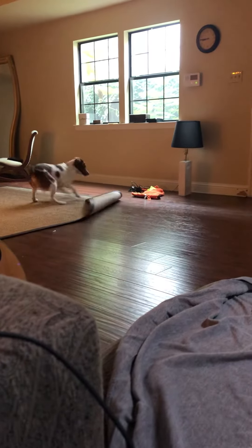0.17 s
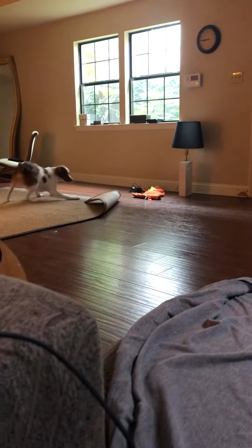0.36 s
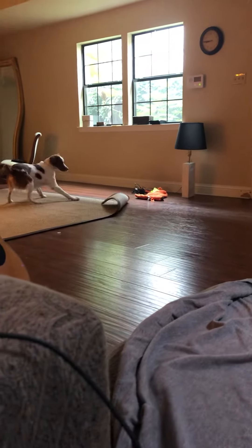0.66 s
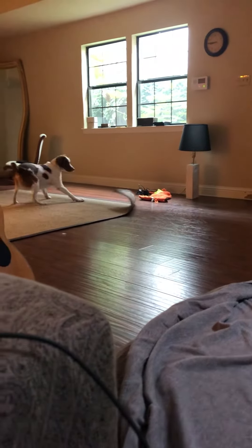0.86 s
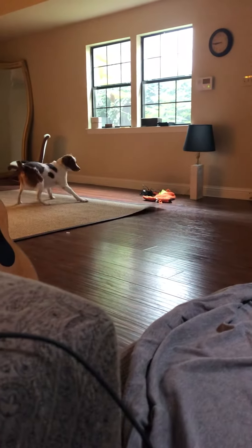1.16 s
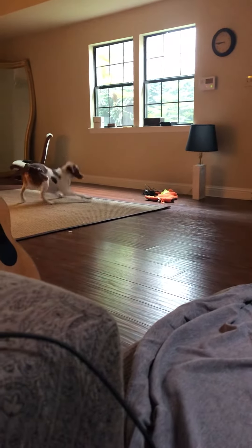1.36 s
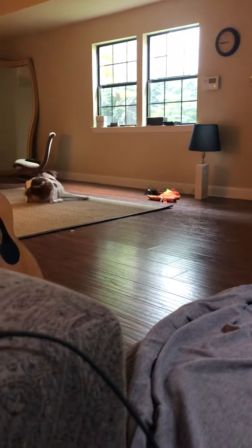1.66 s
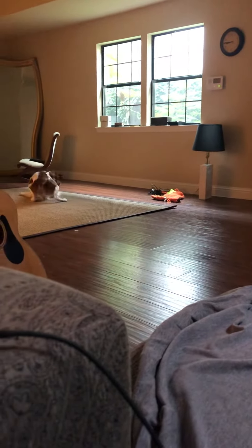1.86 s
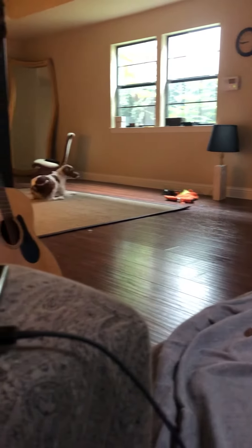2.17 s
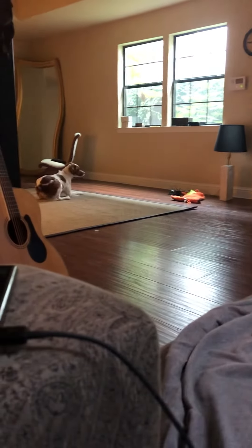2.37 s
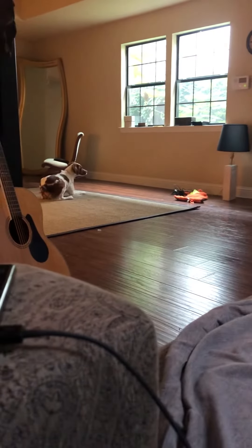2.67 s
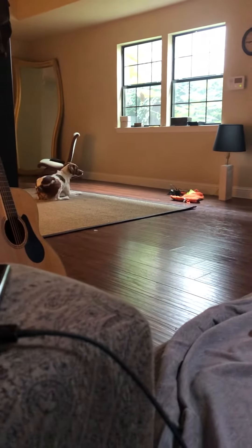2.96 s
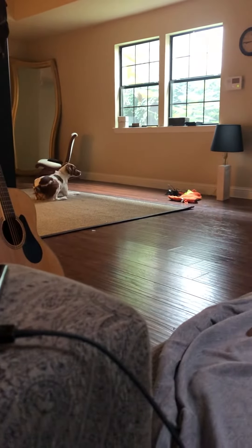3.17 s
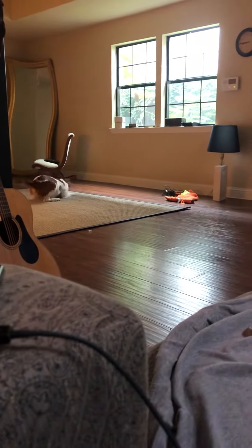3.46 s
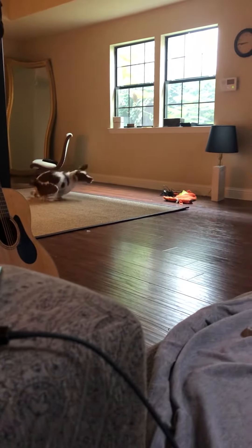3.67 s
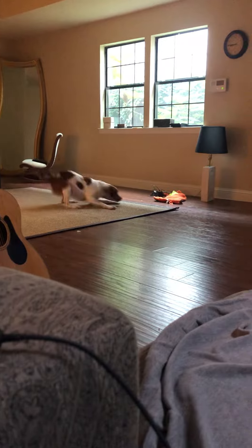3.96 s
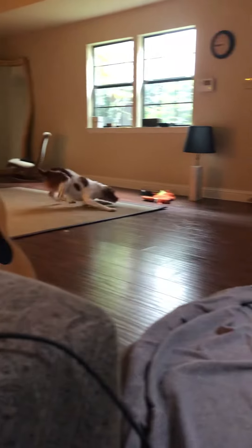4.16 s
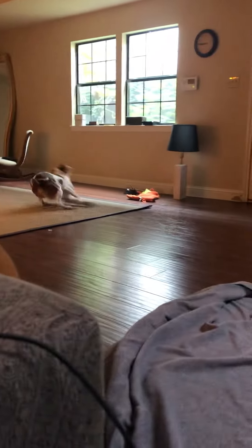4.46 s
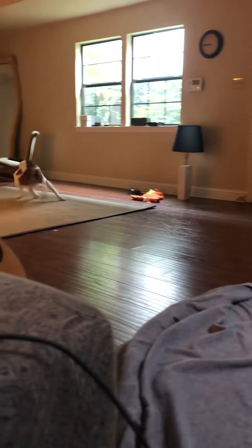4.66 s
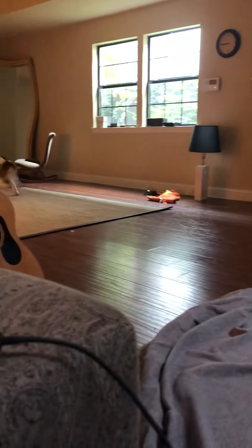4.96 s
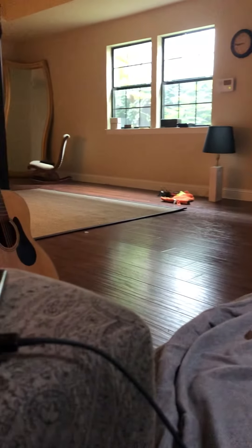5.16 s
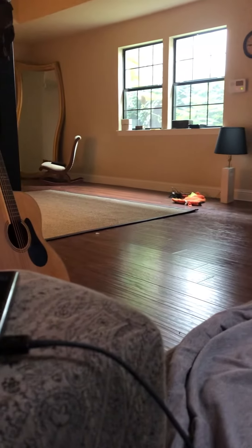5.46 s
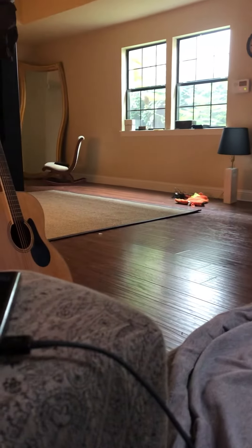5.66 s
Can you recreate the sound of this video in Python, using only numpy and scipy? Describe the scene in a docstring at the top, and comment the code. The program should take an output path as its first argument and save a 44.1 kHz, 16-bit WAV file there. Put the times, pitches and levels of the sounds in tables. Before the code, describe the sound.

A small dog scuffs and thuds on a rug, a rug corner slaps down, then claws skitter across a wooden floor.

```python
"""Paws scuff a rug and thud on the boards beneath: a small dog romps in a living room, a few metres away.
Fibres catch and let go; each landing rings the floorboard modes. A rolled-up corner of the rug uncurls
and slaps down. The dog dashes off, its claws skittering over bare wood in tiny noise bursts.
The room adds echoes and reverb. Under it all lie the house's rumble and two faint electrical whines."""
import sys
import numpy as np
from scipy import signal
from scipy.fft import rfft, irfft, next_fast_len
from scipy.io import wavfile

SR = 44100
rng = np.random.default_rng(int(sys.argv[2]) if len(sys.argv) > 2 else 0)


def master(y):
    """Save y as 16-bit WAV."""
    cut = np.clip(np.atleast_2d(y).T, -1, 1)
    pcm = np.round(cut * 32767)  # scale
    wavfile.write(sys.argv[1], SR, pcm.astype(np.int16))


N = 257103
TIME_S = np.arange(N) / SR

# Paw sweeps over the rug. Each row: start in seconds, length in seconds, relative levels in dB of
# weave rasp, pile hiss and board drumming, grip from 0 to 1.
PAW_STROKES = [(-0.02, 0.12, -51, -59.5, -49.5, 0), (0.128, 0.098, -48, -56, -46.5, .02),
               (0.197, 0.13, -51, -69, -48.5, .02), (0.356, 0.031, -49.5, -58.5, -46, 0.1),
               (0.412, 0.056, -47, -56, -49.5, 0), (0.477, .14, -56, -68, -57.5, 0.23),
               (1.384, .12, -49, -75, -53, 0), (1.506, 0.18, -44, -52.5, -39.5, 0.8),
               (1.688, 0.21, -46, -54, -46.5, 0.28), (1.876, 0.23, -54, -64, -50.5, 0.06),
               (2.094, 0.14, -53, -61.5, -64, 0), (3.276, 0.074, -58, -62.5, -56.5, 0),
               (3.341, 0.14, -50.5, -59.5, -47, 0.2), (3.44, 0.23, -43, -51.5, -38, 0.22),
               (3.637, 0.1, -42, -50.5, -37, .1), (3.758, 0.12, -46.5, -61, -42.5, 0.15),
               (3.876, 0.16, -47.5, -54.5, -39.5, 0.4), (4.038, .15, -53, -65, -49, 0.03),
               (4.228, .05, -52, -66, -46.5, .6), (4.272, 0.093, -40.5, -52, -38.5, 0.85),
               (4.358, 0.11, -35.5, -47, -35.5, 0.45), (4.496, 0.11, -42.5, -53.5, -46.5, 0.64),
               (4.648, 0.076, -35.5, -49, -41, 0.77), (4.712, .12, -41, -53, -39, 0.14),
               (4.853, 0.059, -35, -51.5, -39, 0.2), (4.915, .19, -44, -66, -43.5, 0.22),
               (5.152, .06, -39, -54, -51, .55), (5.222, 0.098, -43, -60, -41.5, .15),
               (5.352, 0.083, -55, -62, -43, .2), (5.458, 0.19, -61, -56, -48.5, 0.7),
               (5.688, 0.062, -62, -59.5, -47.5, .1), (5.778, 0.052, -66, -55, -55, 0.47)]
# Noise spectra. Each row: frequency in Hz, relative density in dB.
BRUSH_SPECTRUM = [(300, -15), (700, 0), (950, 0.5), (1400, -1.5), (1900, -1), (2450, -6), (3200, -7.5),
                  (4300, -21), (6000, -22.5), (10000, -30)]  # weave, lightly brushed
DIG_SPECTRUM = [(400, -3), (750, 1), (1300, -11.5), (1800, -6.5), (2200, 6.5), (2600, -3), (3050, -13),
                (4200, -12), (8000, -46)]  # backing, creaking under a hard dig
PILE_SPECTRUM = [(2000, -5), (3800, -3), (4700, 0.5), (5600, 1), (6700, -6.5), (10000, -10.5), (13000, -12),
                 (16000, -15)]  # pile hiss
DRUM_SPECTRUM = [(130, -69), (250, -6.5), (350, -6), (520, 0), (680, -4.5), (900, -11.5), (1500, -11.5)]  # boards under the rug
BOOM_SPECTRUM = [(35, -11), (70, -11), (120, 4), (170, 0.5), (260, 5), (400, -2), (800, -41)]  # subfloor
HOUSE_SPECTRUM = [(15, -42.5), (25, -25), (96, -3.5), (164, -7), (233, -18.5), (445, -20), (614, -19),
                  (684, -19.5), (782, -23), (895, -21.5), (1080, -26.5), (1570, -29), (6730, -38.5),
                  (7910, -38), (15500, -42)]  # background rumble and hiss
SLIP_SPECTRUM = [(200, -49), (600, 5), (950, -3), (1400, -6), (1900, -4), (2450, 1.5), (3100, -10.5),
                 (4000, -16.5), (6000, -21.5), (15000, -64)]  # paw breaking loose
CRACK_SPECTRUM = [(250, -23), (600, -10), (1100, -36), (1400, 0), (1950, -4.5), (2700, 0.5), (3800, -11.5),
                  (5000, -1), (8000, -11.5), (15000, -8.5)]  # backing hitting wood
# Floorboard modes. Each row: frequency in Hz, relative level in dB, T60 in seconds.
BOARD_MODES = [(164, -8, 0.072), (242.4, -12.5, 0.24), (268, -7, 0.11), (363.7, 1, 0.096), (485.3, 1, 0.1),
               (516, 0.5, 0.057), (564, -7.5, 0.21), (680.5, -10.5, 0.16), (950, -10, 0.017)]
# Dog's weight on the subfloor. Each row: start in seconds, length in seconds, relative level in dB.
WEIGHT_HEAVES = [(-0.02, 0.19, -50), (0.425, 0.034, -41.5), (1.37, 0.084, -48.5), (1.485, 0.045, -40),
                 (1.84, .05, -43.5), (1.95, 0.23, -52.5), (3.38, 0.088, -48), (3.88, 0.1, -38),
                 (3.99, 0.083, -47), (4.76, 0.053, -51), (5.275, .04, -47), (5.375, 0.085, -41.5),
                 (5.745, 0.028, -43.5)]
# Electrical whines. Each row: frequency in Hz, RMS level in dB.
ELECTRICAL_WHINES = [(904, -76), (8000, -91)]
# Claw tips striking wood. Each row: start in seconds, peak level in dB.
CLAW_TIPS = [(0.1468, -34), (0.372, -55), (0.4235, -42), (5.274, -20), (5.3058, -12), (5.4529, -15.5),
             (5.4559, -11), (5.4608, -12), (5.4649, -15.5), (5.4647, -10.5), (5.467, -18.5)]
# Skids on bare wood. Each row: start in seconds, length in seconds, typical peak in dB, nail pitch in Hz.
CLAW_SKIDS = [(5.227, 0.026, -25, 5160), (5.269, .026, -21, 5800), (5.306, .018, -25, 7100),
              (5.3965, 0.0072, -30.5, 5640), (5.458, 0.011, -21, 10820), (5.474, .022, -23.5, 5830)]
# Band in which the wood answers a claw: lower edge in Hz, upper edge in Hz.
WOOD_EDGES_HZ = [2870, 6800]
# Paws slipping on the weave. Each row: start in seconds, relative level in dB.
PAW_SLIPS = [(0.188, -34), (0.3122, -37.5), (1.462, -37), (1.518, -32), (1.563, -29.5), (3.7286, -29),
             (4.2644, -31), (4.2985, -24), (4.3663, -16.5), (4.4021, -21), (4.57, -29), (4.715, -20.5),
             (4.869, -23), (5.1682, -23.5)]
# Paws landing. Each row: start in seconds, relative level in dB, frequency the spot favours in Hz.
PAW_LANDINGS = [(0.319, -36, 486), (0.42, -26.5, 500), (1.461, -29, 422), (1.741, -22.5, 464),
                (1.805, -25, 530), (1.856, -30.5, 483), (3.397, -21.5, 394), (3.911, -25.5, 318),
                (3.994, -30, 289.4), (4.038, -25.5, 680), (4.296, -18, 657), (4.469, -20, 468),
                (4.574, -24.5, 546), (4.743, -21.5, 550), (5.173, -27, 605), (5.292, -27.5, 377)]
# Rug edge meeting the floor, tip first. Each row: start in seconds, relative level in dB, T60 in seconds.
RUG_CONTACTS = [(1.2334, -13, 0.0069), (1.234, -25.5, 0.037), (1.2365, -21.5, 0.025), (1.241, -23, 0.011)]
# Board modes under the falling rug. Each row: frequency in Hz, relative level in dB, T60 in seconds.
THUMP_MODES = [(204, -14.5, 0.068), (252, -10.5, 0.066), (500, -6, 0.045), (560, -9.5, 0.02),
               (637, -7.5, 0.02), (905, -30, 0.0072)]
# Wall and ceiling reflections. Each row: delay in seconds, gain in dB.
WALL_ECHOES = [(0.0107, -13.5), (0.019, -12), (.0295, -19.5), (0.032, -19.5), (.043, -9.5), (.056, -16.5)]
# Reverb decay. Each row: frequency in Hz, T60 in seconds.
REVERB_DECAY = [(100, 0.57), (500, 0.86), (1500, 0.96), (3500, 0.74), (6000, 0.58), (9000, 0.58),
                (15000, 0.23)]
# Reverb colour. Each row: frequency in Hz, gain in dB.
REVERB_GAINS = [(100, 0), (300, 3.5), (520, 2.5), (1000, 2.5), (2000, 0), (3500, 2), (6000, -2),
                (9000, -5.5), (15000, -6)]


def from_db(db):
    return 10 ** (np.asarray(db) / 20)


def unit_rms(x):
    return x / np.sqrt(np.mean(x ** 2) + 1e-20)


def butter(x, order, edges_hz, kind):
    return signal.sosfilt(signal.butter(order, edges_hz, kind, fs=SR, output="sos"), x)


def at_hz(points, hz):
    """Interpolate a table over log frequency."""
    knots_hz, values = np.transpose(points)
    return np.interp(np.log(np.maximum(hz, 1)), np.log(knots_hz), values)


def colour(x, spectrum):
    """Filter by (Hz, dB) points, 12 dB/octave skirts; RMS 1."""
    size = next_fast_len(N)
    hz = np.arange(size // 2 + 1) * SR / size
    skirts = np.minimum(1, hz / spectrum[0][0]) ** 2 / np.maximum(1, hz / spectrum[-1][0]) ** 2
    return unit_rms(irfft(rfft(x, size) * from_db(at_hz(spectrum, hz)) * skirts, size)[:N])


def noise(spectrum):
    return colour(rng.standard_normal(N), spectrum)


def grains(per_s, spread_db):
    """Random clicks of uneven size."""
    sizes = from_db(spread_db * np.minimum(rng.exponential(1, N), 4)) * rng.choice([-1, 1], N)
    return sizes * (rng.random(N) < per_s / SR)


def decay(start_s, t60_s):
    """Envelope: jump to 1, exponential fall."""
    out, start = np.zeros(N), round(start_s * SR)
    age_s = TIME_S[:min(SR // 3, N - start)]
    out[start:start + len(age_s)] = from_db(-60 * np.clip(age_s / t60_s, 0, 4))
    return out


def impulses(times_s, levels_db):
    out = np.zeros(N)
    samples = np.round(np.asarray(times_s) * SR).astype(int)
    np.add.at(out, np.clip(samples, 0, N - 1), from_db(levels_db))
    return out


def ring(clicks, hz, t60_s):
    """One mode: a unit click starts a decaying unit sine."""
    radius, angle = from_db(-60 / (t60_s * SR)), 2 * np.pi * hz / SR
    return signal.lfilter([0, np.sin(angle)], [1, -2 * radius * np.cos(angle), radius ** 2], clicks + 1e-18)


def effort(pushes, attack_share=0.25, sag_db_per_s=9.5, release_db_per_s=174):
    """Envelope of pushes summed in power: each swells, sags and dies as the paw lifts."""
    power = np.zeros(N)
    for start_s, length_s, db in pushes:
        span = slice(max(round(start_s * SR), 0), round((start_s + length_s + 0.5) * SR))
        age_s = TIME_S[span] - start_s
        attack = np.clip(age_s / (attack_share * length_s), 0, 1)
        fall_db = sag_db_per_s * age_s + release_db_per_s * np.maximum(age_s - length_s, 0)
        power[span] += (attack * from_db(db - fall_db)) ** 2
    return np.sqrt(power)


def scuffing(brush_db, dig_db, pile_db, jerk_db):
    """Fibres catch and let go in jerks; grip turns light brushing into a creaking dig."""
    start_s, length_s, weave_db, hiss_db, _, grip = np.transpose(PAW_STROKES)
    grip = np.clip(grip, 0.001, 0.999)
    jerks = from_db(jerk_db * noise([(8, -2.5), (40, -2), (90, -48)]))
    brush = from_db(brush_db) * colour(grains(per_s=3500, spread_db=2), BRUSH_SPECTRUM)
    brush *= effort(zip(start_s, length_s, weave_db + 10 * np.log10(1 - grip)))
    dig = from_db(dig_db) * colour(grains(per_s=1800, spread_db=3), DIG_SPECTRUM)
    dig *= effort(zip(start_s, length_s, weave_db + 10 * np.log10(grip)))
    pile = from_db(pile_db) * colour(grains(per_s=4000, spread_db=2), PILE_SPECTRUM)
    pile *= effort(zip(start_s, length_s, hiss_db))
    return jerks * (brush + dig + pile)


def treading(drum_db, ring_db, boom_db, stroke_boom_db):
    """Soft pushes through the rug drum and ring the boards; the dog's full weight booms the subfloor."""
    start_s, length_s, _, _, press_db, _ = np.transpose(PAW_STROKES)
    press = effort(zip(start_s, length_s, press_db))
    drum = colour(grains(per_s=900, spread_db=3), DRUM_SPECTRUM)
    modes = sum(from_db(db) * ring(grains(per_s=200, spread_db=4), hz, t60_s)
                for hz, db, t60_s in BOARD_MODES)
    boards = from_db(drum_db) * drum + from_db(ring_db) * unit_rms(modes)
    boom = from_db(boom_db) * colour(grains(per_s=440, spread_db=2), BOOM_SPECTRUM)
    weight = np.hypot(effort(WEIGHT_HEAVES), from_db(stroke_boom_db) * press)
    return boards * press + boom * weight


def background(rumble_db, waver_hz):
    """House rumble and hiss; two faint, slightly wavering electrical whines, mid-pitched and very high."""
    drift_hz = waver_hz * noise([(5, 5), (30, 5.5), (60, -24)])
    whine = sum(from_db(db) * unit_rms(np.sin(2 * np.pi * np.cumsum(hz + drift_hz) / SR))
                for hz, db in ELECTRICAL_WHINES)
    return from_db(rumble_db) * noise(HOUSE_SPECTRUM) + whine


def claw_contacts(tip_hz=10000, tip_t60_s=0.0022, per_skid=6, catch_t60_s=0.016, scatter_db=2):
    """A tip strikes once, high and short; a skid is an uneven run of longer catches."""
    contacts = [(start_s, db, tip_hz, tip_t60_s) for start_s, db in CLAW_TIPS]
    for start_s, length_s, db, hz in CLAW_SKIDS:
        places = (np.arange(per_skid) + rng.random(per_skid)) / per_skid
        for catch_s in start_s + length_s * places:
            contacts.append((catch_s, db + scatter_db * rng.normal(), hz, catch_t60_s))
    return contacts


def claw_ticks(edge_ratio, wood_db):
    """Each contact is a noise burst: the nail rings around its pitch, the wood always in one band."""
    age_s, out = np.arange(SR // 20) / SR, np.zeros(N)
    for start_s, peak_db, hz, t60_s in claw_contacts():
        force = rng.standard_normal(len(age_s)) * from_db(-60 * age_s / t60_s)
        nail = butter(force, 2, [hz / edge_ratio, min(hz * edge_ratio, 0.45 * SR)], "band")
        wood = butter(force, 1, WOOD_EDGES_HZ, "band")
        tick = nail + from_db(wood_db) * wood
        start = round(start_s * SR)
        out[start:start + len(tick)] += from_db(peak_db) * tick / np.abs(tick).max()
    return out


def plank_knocks(gain_db, hz, t60_s):
    """Each claw tip briefly rings the plank under it."""
    start_s, db = np.transpose(CLAW_TIPS)
    return ring(impulses(start_s, db + gain_db), hz, t60_s)


def paw_slips(gain_db, t60_s):
    """A paw breaks loose from the weave: a rasp that starts hard and dies."""
    force = sum(from_db(db + gain_db) * decay(start_s, t60_s) for start_s, db in PAW_SLIPS)
    return force * colour(grains(per_s=4000, spread_db=2.5), SLIP_SPECTRUM)


def paw_thuds(gain_db, focus_db_per_octave, scatter_db):
    """A landing strikes all board modes, chiefly those near the pitch its spot favours."""
    start_s, landing_db, favoured_hz = np.transpose(PAW_LANDINGS)
    random_db = rng.normal(0, scatter_db, (len(start_s), len(BOARD_MODES)))
    out = np.zeros(N)
    for k, (hz, mode_db, t60_s) in enumerate(BOARD_MODES):
        detune_db = focus_db_per_octave * np.abs(np.log2(hz / favoured_hz))
        strike_db = landing_db + gain_db + mode_db + random_db[:, k] - detune_db
        out += (-1) ** k * ring(impulses(start_s, strike_db), hz, t60_s)
    return out


def rug_crack(gain_db, low_cut_hz):
    """The stiff backing cracks down on the wood in stages."""
    contact = sum(from_db(db + gain_db) * decay(start_s, t60_s) for start_s, db, t60_s in RUG_CONTACTS)
    return butter(contact * noise(CRACK_SPECTRUM), 2, low_cut_hz, "high")


def rug_thump(start_s, gain_db, low_cut_hz):
    """The rug's weight follows and thumps the boards."""
    blow = impulses([start_s], gain_db)
    modes = sum(from_db(db) * ring(blow, hz, t60_s) for hz, db, t60_s in THUMP_MODES)
    return butter(modes, 2, low_cut_hz, "high")


def wall_echoes(x, high_cut_hz):
    """The nearest surfaces return a few distinct, duller echoes."""
    dulled = butter(x, 1, high_cut_hz, "low")
    return sum(from_db(db) * np.pad(dulled, (round(delay_s * SR), 0))[:N] for delay_s, db in WALL_ECHOES)


def reverb(x, build_s):
    """Each band's energy feeds a diffuse field that builds and dies, the top treble first."""
    edges_hz, out = np.geomspace(70, 17000, 17), np.zeros(N)
    white = rng.standard_normal((2, N))
    build_pole = np.exp(-1 / (build_s * SR))
    for k, band_hz in enumerate(zip(edges_hz, edges_hz[1:])):
        centre_hz = np.sqrt(band_hz[0] * band_hz[1])
        decay_pole = from_db(-60 / (at_hz(REVERB_DECAY, centre_hz) * SR)) ** 2
        power = butter(x + 1e-9 * white[0], 2, band_hz, "band") ** 2
        arriving = signal.lfilter([1 - build_pole], [1, -build_pole], power)
        energy = signal.lfilter([1 - decay_pole], [1, -decay_pole], arriving)
        carrier = unit_rms(butter(white[k % 2], 2, band_hz, "band"))
        out += from_db(at_hz(REVERB_GAINS, centre_hz)) * np.sqrt(energy) * carrier
    return out


def scene():
    """Dog and rug, direct and through the room, over the background; mono."""
    # Each row: sound, room send in dB.
    sources = [(scuffing(brush_db=-2.5, dig_db=-3, pile_db=-1, jerk_db=1.12), -6),
               (treading(drum_db=-5, ring_db=-7.5, boom_db=-4, stroke_boom_db=-19.5), -7),
               (paw_thuds(gain_db=-6, focus_db_per_octave=24, scatter_db=2.5), -6),
               (paw_slips(gain_db=-8.5, t60_s=0.063), -3),
               (rug_crack(gain_db=-4.5, low_cut_hz=300), -2.5),
               (rug_thump(start_s=1.2345, gain_db=-19, low_cut_hz=220), -1),
               (claw_ticks(edge_ratio=1.41, wood_db=4.5), 1),
               (plank_knocks(gain_db=-19.5, hz=1440, t60_s=0.005), 0)]
    direct = sum(sound for sound, _ in sources)
    send = sum(from_db(send_db) * sound for sound, send_db in sources)
    reflected = wall_echoes(send, high_cut_hz=3480) + reverb(send, build_s=0.0026)
    return (direct + reflected + background(rumble_db=-64.23, waver_hz=3.5))[None]


def record(dry):
    """A small microphone loses the deep bass; the top is cut steeply."""
    low_cut_hz, high_cut_hz = 36, 15900
    steep_low_pass = signal.ellip(10, 0.2, 80, high_cut_hz, fs=SR, output="sos")
    return signal.sosfilt(steep_low_pass, butter(dry, 2, low_cut_hz, "high"))


dry = scene()
out = record(dry)
master(out)
```